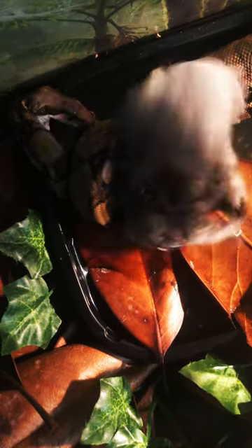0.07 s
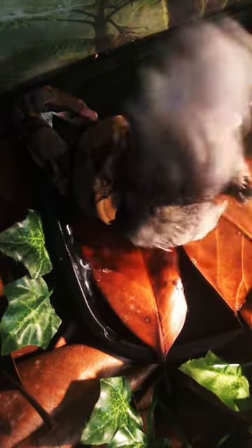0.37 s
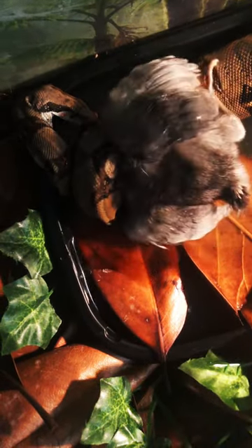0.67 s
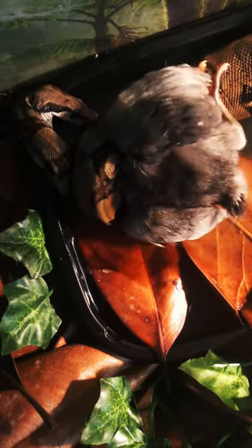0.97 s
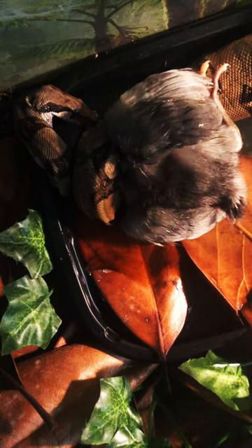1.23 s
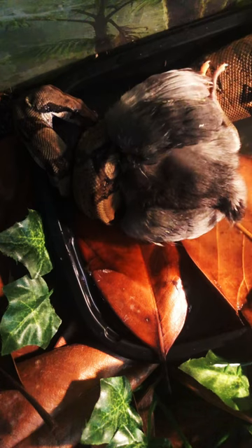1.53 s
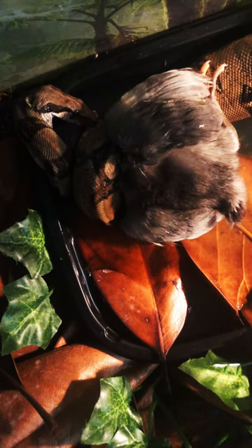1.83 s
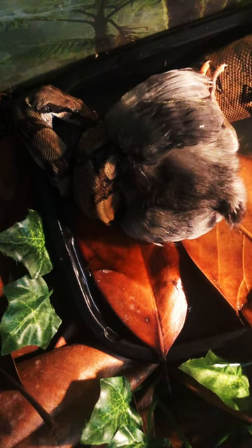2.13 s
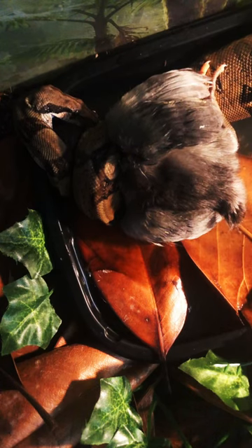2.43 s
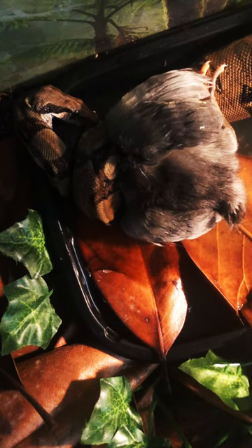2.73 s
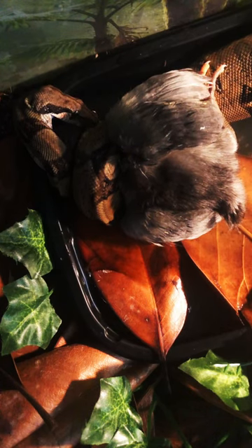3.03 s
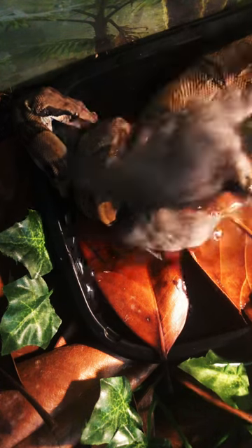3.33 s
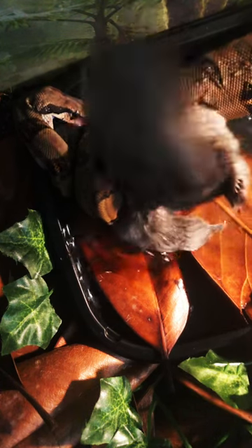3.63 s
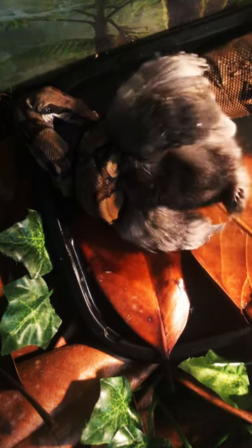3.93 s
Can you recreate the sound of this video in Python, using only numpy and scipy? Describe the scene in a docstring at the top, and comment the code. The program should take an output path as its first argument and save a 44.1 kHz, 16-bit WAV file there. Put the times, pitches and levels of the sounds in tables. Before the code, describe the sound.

Two brief flurries of wingbeats and rustling feathers over a faint fan hum.

```python
"""A ventilation fan hums and rumbles throughout in a small room. At once a bird, held by a snake in a
glass enclosure, beats its wings in a short burst, about seven beats a second. In each beat the feathers
swish over one another by friction; the wing slaps the leaves, at its hardest the dish too, then drags and
settles. In the lull a single feather slides faintly, twice. A second burst follows from 3.2 to 3.7 s,
and a last quill snaps near 3.9 s. The walls add a short reverberation to each movement."""
import sys
import numpy as np
from scipy import signal
from scipy.fft import rfft, irfft, next_fast_len
from scipy.io import wavfile
from scipy.ndimage import uniform_filter1d, map_coordinates

SR = 44100
rng = np.random.default_rng(int(sys.argv[2]) if len(sys.argv) > 2 else 0)


def generate_wav(sig):
    """Save sig (samples, or channels by samples) to the path in sys.argv[1] as 16-bit PCM at SR."""
    pcm = np.round(np.clip(np.atleast_2d(sig).T, -1, 1) * 32767).astype(np.int16)
    wavfile.write(sys.argv[1], SR, pcm)


N = 176400
SNAP_ATTACK_S = 0.00008


def amp(db):
    """Amplitude ratio of a level in decibels."""
    return 10 ** (np.asarray(db) / 20)


def unit(x):
    """Normalisation to rms 1."""
    return x / np.sqrt(np.mean(x ** 2) + 1e-20)


def along(points, hz):
    """Interpolation of (f/Hz, value) points on a logarithmic frequency axis."""
    f, value = np.transpose(points)
    return np.interp(np.log(hz + 1), np.log(f + 1), value)


def wobble(rate, size=N):
    """Smooth random modulation: a spline through `rate` Gaussian values a second."""
    return map_coordinates(rng.standard_normal(size // 8), [np.arange(size) * rate / SR], mode="wrap")


def filtered(x, response):
    """Linear filtering: the spectrum of x times a frequency response."""
    size = next_fast_len(N + SR // 2)
    return irfft(rfft(x, size) * response(np.fft.rfftfreq(size, 1 / SR)), size)[:N]


def noise(spectrum, patchy_db=0, tilt_db=0, size=N):
    """Spectrally shaped noise of rms 1, tilted per octave, with random gain in time-frequency patches."""
    white = signal.stft(rng.standard_normal(size), nperseg=256)[2]
    patches = uniform_filter1d(rng.standard_normal(white.shape), size=7, axis=0)
    patches = uniform_filter1d(patches, size=3, axis=1)
    mottled = signal.istft(white * amp(patchy_db * unit(patches)), nperseg=256)[1][:size]
    hz = np.fft.rfftfreq(size, 1 / SR)
    shape_db = along(spectrum, hz) + tilt_db * np.log2(hz + spectrum[0][0])
    return unit(irfft(rfft(mottled) * amp(shape_db), size))


def envelope(t, length, attack, t60):
    """Linear rise, then exponential decay from `length` on, by 60 dB in t60; all times in seconds."""
    return np.clip(t / attack, 0, 1) * amp(-60 * np.maximum(t - length, 0) / t60)


def add(out, s, sound):
    """Superposition of a sound on `out`, starting at s seconds."""
    part = out[max(round(s * SR), 0):][:len(sound)]
    part += sound[:len(part)]


def fan():
    """Tonal plus broadband noise: a hum wavering in phase and amplitude over duct rumble and air noise."""
    # spectra of the duct rumble and of the room's air noise: f/Hz, relative level/dB
    rumble = [(22, -25), (32, -50), (42, -7), (53, -18), (65, -7.5), (77, 2.5), (92, -1), (105, -6.5),
              (120, -8), (155, -9.5), (190, -13.5), (225, -17.5), (270, -26), (400, -63.5)]
    air = [(130, -27.5), (220, -10), (275, -1.5), (330, -14), (400, -9), (540, -6), (610, -10), (800, -14),
           (1550, -27), (2600, -27.5), (7200, -39), (16000, -48)]
    hum_hz, drift_rad, waver_db = 175.67, 0.19, 0.9
    phase = 2 * np.pi * hum_hz * np.arange(N) / SR + drift_rad * wobble(5)
    hum = unit(np.sin(phase) * amp(waver_db * wobble(10)))
    return amp(-49) * hum + amp(-46.5) * noise(rumble) + amp(-61.5) * noise(air)


def walls(x):
    """Reverberation: convolution with an exponentially decaying noise tail, longest near 2 kHz."""
    # reverberation time of the enclosure: f/Hz, T60/s
    decay_times = [(200, 0.23), (2000, 0.45), (7000, 0.33), (15000, 0.35)]
    hz, t, white = signal.stft(rng.standard_normal(SR // 2), SR, nperseg=256)
    decay = amp(-60 * t / along(decay_times, hz)[:, None])
    tail = signal.istft(white * decay, SR, nperseg=256)[1]
    return signal.fftconvolve(x, tail / np.linalg.norm(tail))[:N]


def rubbing(movements, spectrum, attack, t60, patchy_db, grain_db=1.5):
    """Stick-slip friction: barbs catch and slip, singly and in clumps, modulating a burst of noise."""
    clump_rate, barb_rate = 455, 2900  # level changes a second
    out, t = np.zeros(N), np.arange(SR // 10) / SR
    for s, length, db, tilt_db in movements:
        grain = unit(amp(grain_db * (wobble(clump_rate, len(t)) + wobble(barb_rate, len(t)))))
        hiss = noise(spectrum, patchy_db, tilt_db, size=len(t))
        add(out, s, amp(db) * envelope(t, length, attack, t60) * grain * hiss)
    return out


def brush():
    """Light friction: soft plumage brushes as the wing lifts or folds."""
    # lifts and folds: t/s, duration/s, level/dB, tilt/(dB per octave)
    movements = [(.019, 0.038, -57.5, -0.5), (.062, 0.027, -71, 1), (.094, .02, -61, 0.5),
                 (.175, 0.073, -66, -1), (3.163, 0.044, -63, -3.5), (3.195, .032, -65, 1.5),
                 (3.305, 0.051, -62, 1.5), (3.408, .032, -61, 0), (3.476, .022, -66, 2.5),
                 (3.555, 0.013, -66, .5), (3.905, .028, -71.5, -0.5)]
    # spectrum of the plumage: f/Hz, relative level/dB
    spectrum = [(200, -6), (1000, -1.5), (2500, -3.5), (4500, -1.5), (6500, -7.5), (8500, -9.5),
                (12000, -8), (16000, -5)]
    return rubbing(movements, spectrum, attack=0.0031, t60=0.068, patchy_db=1, grain_db=1)


def zips():
    """Near-periodic excitation: a feather slides over an edge; its barb rate sets a band of hiss."""
    # single feathers sliding: t/s, duration/s, level/dB, centre f/Hz
    slides = [(0.121, 0.0062, -48, 2850), (0.148, .005, -47, 6160), (0.211, .005, -56, 2600),
              (0.359, 0.013, -66, 3930), (0.635, 0.016, -71.5, 5960), (1.824, 0.0026, -64.5, 4800),
              (3.294, 0.0073, -53.5, 3800), (3.386, 0.0022, -51, 2820), (3.551, 0.0036, -52, 6500)]
    out, t = np.zeros(N), np.arange(SR // 20) / SR
    for s, length, db, hz in slides:
        band = [(hz / 4, -26), (hz / 2, -13), (hz, 0), (2 * hz, -26)]  # f/Hz, relative level/dB
        add(out, s, amp(db) * envelope(t, length, attack=0.0022, t60=0.028) * noise(band, size=len(t)))
    return out


def drag():
    """Sliding friction: wing tips scrape over the leaves, duller than the swish."""
    # drags of the wing tips: t/s, duration/s, level/dB, tilt/(dB per octave)
    movements = [(.022, 0.013, -64, -5), (.048, 0.0059, -60, 0.5), (.138, 0.0033, -44.5, -1.5),
                 (.145, 0.01, -46.5, 7), (.157, 0.019, -55, -1), (.284, 0.0041, -51.5, 0),
                 (.297, 0.027, -57, 0.5), (.362, 0.022, -70, -0.5), (3.263, 0.0027, -43, 3),
                 (3.274, 0.03, -57, 2), (3.393, 0.01, -43.5, 1.5), (3.537, 0.014, -50, 4),
                 (3.621, 0.0086, -55.5, -2), (3.679, 0.0063, -55.5, 1)]
    # spectrum of the scrape: f/Hz, relative level/dB
    spectrum = [(100, -25), (250, 1), (500, 2), (800, 5), (1300, -2), (2500, -2), (3700, -2.5),
                (5000, -4.5), (6700, -2), (9000, -11), (12000, -11), (16000, -11.5)]
    return rubbing(movements, spectrum, attack=0.0012, t60=0.036, patchy_db=2)


def dish():
    """Impact: the hardest beats knock on the plastic dish, a band-pass impulse response."""
    # blows on the dish: t/s, peak level/dB, upper cutoff f/Hz
    blows = [(0.138, -34.5, 434), (3.3934, -26.5, 544)]
    low_hz = 235
    highpass = signal.butter(4, low_hz, "high", fs=SR, output="sos")
    out = np.zeros(N)
    for s, db, top_hz in blows:
        lowpass = signal.butter(8, top_hz, fs=SR, output="sos")
        thud = signal.sosfilt(np.vstack([lowpass, highpass]), signal.unit_impulse(SR // 10))
        add(out, s, amp(db) * thud / np.abs(thud).max())
    return out


def crack(t, hz):
    """Damped oscillation: one quill's click falls by 60 dB in 3.4 cycles."""
    return np.sin(2 * np.pi * hz * t) * envelope(t, SNAP_ATTACK_S, SNAP_ATTACK_S, t60=3.4 / hz)


def slaps():
    """Impulsive excitation: a stiff quill lands, five neighbours crackle around it, the leaf shivers."""
    # quills snapping against the leaves: t/s, level/dB, f/Hz
    snaps = [(0.0325, -36, 4960), (.0957, -43, 5500), (0.1366, -13.5, 6000), (0.2479, -33.5, 1460),
             (0.2785, -33, 4200), (0.285, -29, 5450), (3.2612, -26, 5070), (3.3924, -23, 4060),
             (3.5050, -28, 9050), (3.534, -25.5, 4900), (3.932, -43, 5250)]
    # spectrum of the shivering leaf: f/Hz, relative level/dB
    leaf = [(200, 24.5), (700, -29), (1200, -34), (2400, -24), (4000, 4), (5800, 16), (7500, 11),
            (10000, 0), (16000, -23)]
    shiver_db, neighbour_db, neighbour_ratio = -19, -11, 0.73  # relative to the main quill
    scatter_s, scatter_octaves = 0.001, 0.62  # of the neighbours, either way
    out, t = np.zeros(N), np.arange(SR // 20) / SR
    for s, db, hz in snaps:
        shiver = noise(leaf, size=len(t)) * envelope(t, 0, SNAP_ATTACK_S, t60=0.047)
        add(out, s, amp(db) * (crack(t, hz) + amp(shiver_db) * shiver))
        for lag, detune in rng.uniform(-1, 1, size=(5, 2)):
            neighbour_hz = hz * neighbour_ratio * 2 ** (scatter_octaves * detune)
            add(out, s + scatter_s * lag, amp(db + neighbour_db) * crack(t, neighbour_hz))
    return out


def flap():
    """Transient friction noise: the feathers snap open with a hollow, papery mid-range peak."""
    # openings of the wing: t/s, duration/s, level/dB, tilt/(dB per octave)
    movements = [(.118, 0.007, -44, 7), (.245, 0.0061, -55.5, 1), (3.230, .012, -55, -6)]
    # spectrum of the hollow flap: f/Hz, relative level/dB
    spectrum = [(200, -25), (750, -16), (1150, 1.5), (1550, 1), (2000, -6), (2800, -14), (3700, -28),
                (16000, -56)]
    return rubbing(movements, spectrum, attack=0.003, t60=0.08, patchy_db=-6)


def swish():
    """Broadband friction noise: feathers slide over one another in each wing stroke."""
    # wing strokes: t/s, duration/s, level/dB, tilt/(dB per octave)
    movements = [(.116, 0.013, -40, 1), (.243, 0.014, -44, 0), (.260, 0.03, -47, 0.2),
                 (3.228, 0.026, -43, 0), (3.361, 0.024, -44, -0.9), (3.501, 0.006, -47, -2.7),
                 (3.509, 0.017, -44, 0.5), (3.661, 0.027, -55.5, -0.5)]
    # spectrum of the bright swish: f/Hz, relative level/dB
    spectrum = [(150, 4), (350, 4), (520, 4), (730, -14), (1100, 1), (1500, 2.5), (2000, -5), (2500, -1.5),
                (3400, -3), (6300, 2), (8500, 0), (11000, -2.5), (15500, 2)]
    return rubbing(movements, spectrum, attack=0.0011, t60=0.036, patchy_db=2.5)


def scene():
    """Superposition of the bird's direct sound, its reverberation and the fan."""
    bird = flap() + swish() + drag() + brush() + zips() + slaps() + dish()
    return (bird + amp(-18) * walls(bird) + fan())[None]


def record(dry):
    """Band limiting: an ideal low-pass filter removes the highest treble."""
    cutoff_hz = 15950
    return filtered(dry[0], lambda hz: hz < cutoff_hz)[None]


dry = scene()
out = record(dry)
generate_wav(out)
```